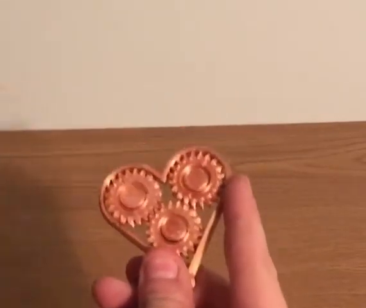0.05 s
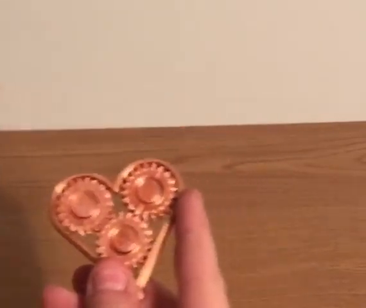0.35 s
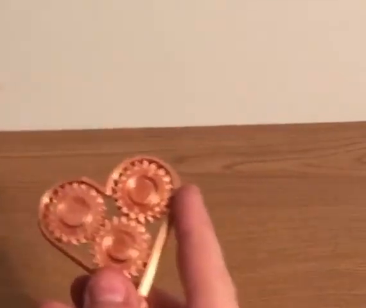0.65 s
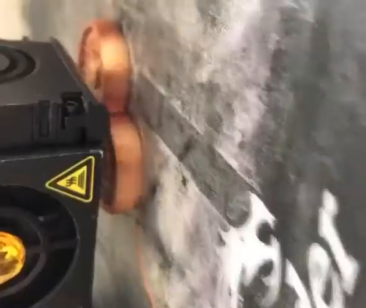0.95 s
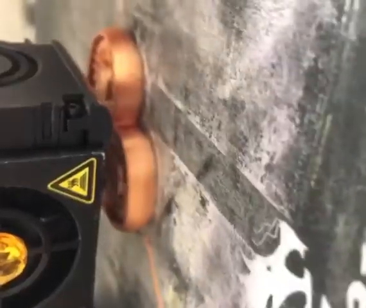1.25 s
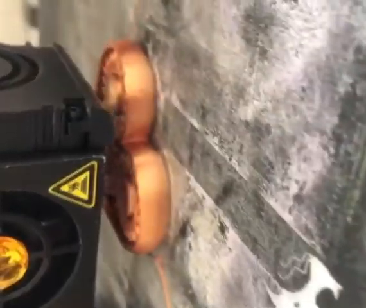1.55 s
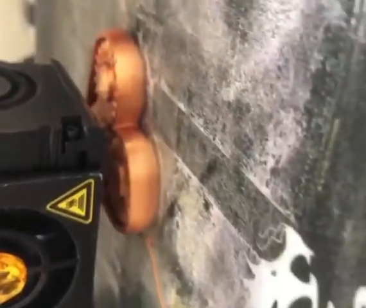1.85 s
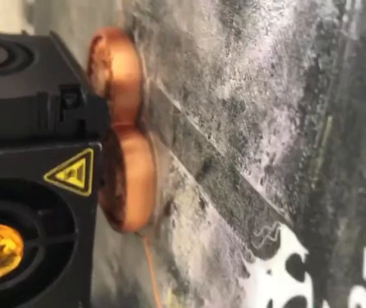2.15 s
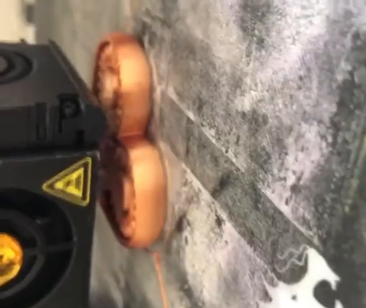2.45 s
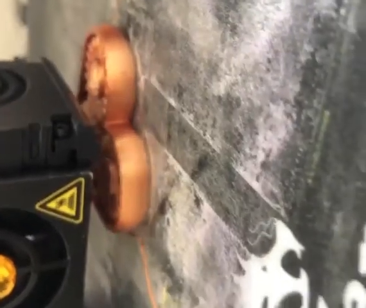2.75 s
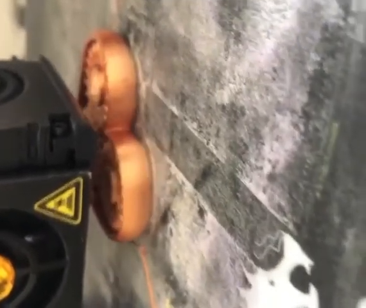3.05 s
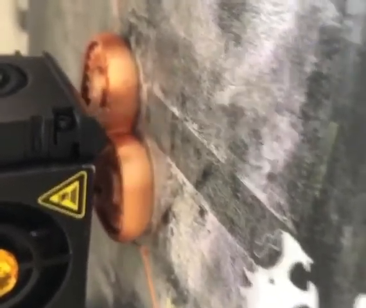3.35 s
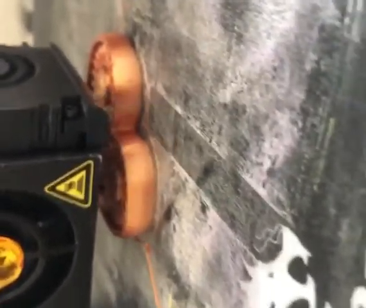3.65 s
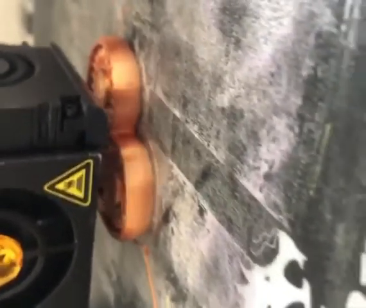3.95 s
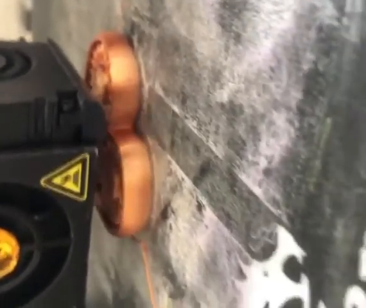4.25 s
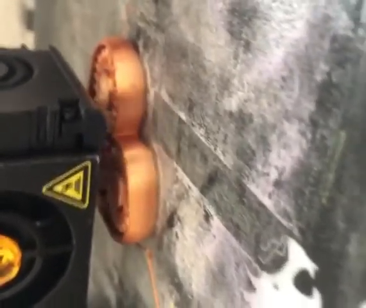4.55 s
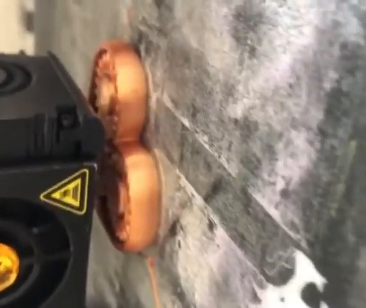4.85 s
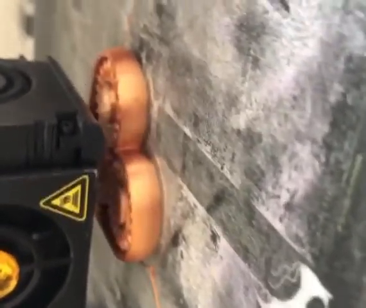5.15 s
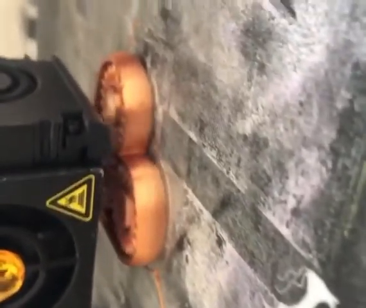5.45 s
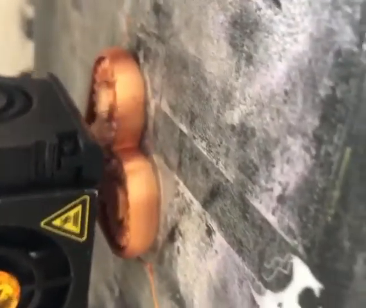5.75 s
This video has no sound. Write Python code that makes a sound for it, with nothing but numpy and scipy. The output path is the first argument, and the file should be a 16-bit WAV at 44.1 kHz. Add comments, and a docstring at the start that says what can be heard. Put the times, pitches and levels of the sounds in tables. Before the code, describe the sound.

In a quiet room, a hand faintly rustles on a small plastic gear toy, which ticks once. Suddenly a 3D printer is running close to the microphone. Its fans whir with a steady, thin whine while the motors make a quick move, then sing in smooth rising and falling sweeps. They switch to a fast back-and-forth zigzag, with light rattles and short shudders at the turns.

```python
"""A 3D printer starts up

In a quiet room a hand turns a small gear toy, which rustles and ticks once. Suddenly a 3D printer is
at work close by, in mono. Its fans whir and whine while two stepper motors trace two circles, then a
fast zigzag filling, with quick hops in between. The motors move in tiny steps: they sing at the rate
of those steps, hum at the slower rate of their full steps and shake the frame at the turns."""
import sys
import numpy as np
from scipy import signal
from scipy.fft import rfft, irfft, next_fast_len
from scipy.io import wavfile

SR = 44100
rng = np.random.default_rng(int(sys.argv[2]) if len(sys.argv) > 2 else 0)


def materialize(psi):
    """Save the field psi as 16-bit PCM at rate SR to the path in sys.argv[1].

    A 1-D psi becomes a single channel; in a 2-D psi each row is a channel.
    """
    bounded = np.clip(np.atleast_2d(psi).T, -1, 1)
    quanta = np.round(bounded * 32767).astype(np.int16)
    wavfile.write(sys.argv[1], SR, quanta)


N = 265041
T = np.arange(N) / SR

# the room's hush and the hand's rustle (frequency [Hz], level [dB])
ROOM = [(20, -112), (45, -89), (100, -88.5), (250, -94), (450, -96.5), (800, -104), (2000, -112),
        (5000, -114), (15000, -116)]
RUSTLE = [(30, -105), (120, -90), (400, -99), (1000, -110), (4000, -114), (15000, -113)]
# a low hum and a faint, thin high whistle in the room (frequency [Hz], width [Hz], boost [dB])
HUM_AND_WHISTLE = [(77, 16, 13), (5300, 350, 8)]
# the tick of the gears (frequency [Hz], level [dB])
TICK = [(100, -98), (600, -84), (1300, -85), (2600, -106), (15000, -125)]
# rushing fan air (frequency [Hz], level [dB])
AIR = [(25, -100), (55, -78.5), (150, -80.5), (330, -71), (480, -79.5), (900, -78.5), (1450, -81),
       (2000, -78), (3300, -78.5), (4500, -83), (5700, -83.5), (7300, -92), (9500, -96.5), (13300, -95.5),
       (15500, -102)]
# resonances (ringing pitches) of the air duct and frame (frequency [Hz], width [Hz], boost [dB])
AIR_MODES = [(60, 14, 8), (76, 14, 8), (125, 20, 13), (150, 16, -6), (180, 28, 12), (207, 14, -5),
             (243, 20, 9), (328, 45, 7), (380, 40, 7), (565, 30, 3), (850, 90, 4), (1330, 130, 2),
             (2810, 180, 4), (3840, 120, -6), (5680, 160, 3), (6320, 160, -4), (7850, 300, 6),
             (8300, 90, 10), (8750, 160, 5), (10200, 110, 6), (10900, 350, 3), (13030, 160, 3),
             (15000, 300, 4)]
# tones of the small fan's blades (multiple of BLADE_HZ, level [dB])
BLADES = [(1, -55), (2, -56), (3, -55), (4, -75)]
# steady tones of the fan motors (frequency [Hz], level [dB])
FAN_TONES = [(2579, -61), (2826, -56), (3035, -56), (3331, -65), (3574, -66), (3908, -67), (4883, -67),
             (5652, -68), (5860, -72)]
# quick hops of the print head (start [s], end [s], step rate limit [Hz], whine [dB], hum [dB])
HOPS = [(.8, 1.066, 6350, -1.5, 1), (1.05, 1.21, 7400, -8, -12), (5.587, 5.756, 5660, 1, -1)]
# motor whine: both on a straight move, then each on a circle (multiple of the step rate, level [dB])
STRAIGHT_WHINE = [(1, -46), (2, -53.5), (3, -62.5)]
X_WHINE = [(1, -62), (2, -51), (3, -54)]
Y_WHINE = [(1, -45), (2, -58), (3, -69)]
# motor hum on straight moves and on circles (multiple of the full-step rate, level [dB])
STRAIGHT_HUM = [(1, -51.5), (2, -65.5), (3, -67.5), (4, -74.5), (6, -79), (8, -60)]
CIRCLE_HUM = [(1, -59), (2, -56.5), (4, -62.5), (5, -57), (6, -58.5)]
# on a circle the X and Y motors take turns; the X motor's sweeps (time of top speed [s])
X_SWEEPS = [1.565, 1.96, 2.43, 2.85]
# the Y motor's sweeps (time of top speed [s], shudder speeding up [dB], shudder slowing down [dB])
Y_SWEEPS = [(1.36, -32, -35), (1.77, -35, -43), (2.2, -32.5, -36), (2.64, -33.5, -26)]
# zigzags that fill a disc (start [s], first line from centre [steps], line spacing [steps], strokes)
ZIGZAGS = [(2.904, -151.2, 25.25, 16), (5.724, -176.4, -25.25, 2)]
# how well the motor mounts give off sound (frequency [Hz], gain [dB])
MOUNT = [(40, -25), (120, -4), (300, 0), (1000, -3), (1700, -9), (2500, -14), (3200, -4), (3800, -7),
         (4900, -10), (6500, -11), (7300, -17), (9000, -11), (15000, -11)]
# resonances of the mounts (frequency [Hz], width [Hz], boost [dB])
MOUNT_MODES = [(283, 50, 8), (338, 50, 8), (660, 50, 3), (860, 100, 4), (1005, 50, 8), (2795, 110, 13),
               (3480, 350, 7), (4080, 180, 5), (4530, 160, 6), (5620, 200, 14), (6350, 200, -8),
               (7880, 220, 12), (8340, 160, 14), (9050, 200, 8), (11320, 200, 4), (13570, 300, 6)]
# rattle of the belts and the carriage that holds the head (frequency [Hz], level [dB])
RATTLE = [(40, -81.5), (120, -75.5), (330, -77), (480, -81), (900, -79), (1400, -87), (3000, -89.5),
          (7000, -113.5), (15000, -110)]
# resonances of that rattle (frequency [Hz], width [Hz], boost [dB])
RATTLE_MODES = [(331.8, 72, 19.4), (862, 58, 10.6), (1001, 44, 11.4)]
# single jolts of the frame (time [s], level [dB])
JOLTS = [(.833, -35.5), (.883, -30.5), (1.016, -30), (1.665, -31.5), (2.108, -28), (5.518, -36),
         (5.622, -33), (5.69, -34.5)]
# the frame's shudder after each zigzag turn (level [dB])
TURN_DB = [-44, -34.5, -43, -34, -44, -32, -34.5, -39, -45, -38, -31, -39, -35, -37, -34, -42]
# squeaks in every Y sweep (time from top speed [s], pitch [Hz], level [dB], glide [Hz/s])
SQUEAKS = [(-.098, 4120, -47, -26000), (0.043, 5380, -50, -12000)]

BLADE_HZ, FRAME_HZ, TOP_HZ = 893.7, 337.7, 15600  # fan blade tone, frame resonance, treble limit
MICROSTEPS = 16  # tiny steps in one full step
ZIGZAG_HZ, CIRCLE_HZ = 4524, 2795  # top step rates
ZIGZAG_RAMP_HZ_PER_S, HOP_RAMP_HZ_PER_S, CIRCLE_RAD_PER_S = 56600, 80000, 7.3
DISC_RADIUS_STEPS, TURN_OVERLAP_S = 268.3, .02624
ROOM_END_S, PRINTER_START_S, PRINTER_FULL_S = .775, .788, .812
PRINTER_DB, RISE_DB_PER_S = -.5, .19


def undb(db):
    """Turn decibels into a number to multiply by."""
    return 10 ** (np.asarray(db) / 20)


def noise():
    """An even hiss (white noise) of 0 dB per Hz."""
    return rng.standard_normal(N) * np.sqrt(SR / 2)


def wander(rate):
    """A smooth random wobble of about size 1, changing about rate times a second."""
    f = np.arange(N // 2 + 1) * SR / N
    wobble = irfft(rfft(rng.standard_normal(N)) * np.exp(-(f / rate) ** 2), N)
    return wobble / wobble.std()


def swell(time, length):
    """A bell-shaped rise and fall around time, length seconds wide at half height."""
    return np.exp(-np.log(2) * (2 * (T - time) / length) ** 2)


def fade_in(start, length=.0088):
    """A quick ramp from silence to full."""
    return np.clip((T - start) / length, 0, 1)


def colour(sound, outline, peaks):
    """Shape a sound's bass and treble with a smooth outline, plus narrow peaks and dips."""
    size = 2 * next_fast_len(N // 2 + 8192)
    f = np.arange(size // 2 + 1) * SR / size
    hz, db = np.transpose(outline)
    gain_db = np.interp(np.log(f + 1), np.log(hz), db)
    for centre, width, boost in peaks:
        gain_db = gain_db + boost / (1 + (2 * (f - centre) / width) ** 2)
    # this makes the filter ring after each sound, never before it
    cepstrum = irfft(np.log(undb(gain_db)))[:size // 2]
    cepstrum[1:] *= 2
    return irfft(rfft(sound, size) * np.exp(rfft(cepstrum, size)))[:N]


def tones(hz, multiples, flutter_db):
    """Tones at multiples of a moving pitch, each fluttering in level."""
    phase = 2 * np.pi * np.cumsum(hz) / SR
    out = 0
    for k, db in multiples:
        gain = undb(db + flutter_db * wander(24.5)) * (k * hz < TOP_HZ)
        out = out + np.sqrt(2) * gain * np.sin(k * phase + rng.uniform(0, 2 * np.pi))
    return out


def rings(rows):
    """Tones that swell and die away (time [s], pitch [Hz], level [dB], length [s], glide [Hz/s])."""
    out = np.zeros(N)
    for time, hz, db, length, glide in rows:
        cycles = (hz + glide * (T - time) / 2) * (T - time)
        tone = np.sin(2 * np.pi * cycles + rng.uniform(0, 2 * np.pi))
        out += np.sqrt(2) * undb(db) * swell(time, length) * tone
    return out


def room():
    """The hush of a quiet room, with a low hum and a faint, thin high whistle."""
    return undb(-2.3) * colour(noise(), ROOM, HUM_AND_WHISTLE)


def gear_toy(tick_s=.723, decay_s=.0014):
    """A hand rustles on a small plastic toy, then its gears tick once."""
    rustle = colour(noise() * swell(time=.23, length=.17), RUSTLE, [])
    burst = noise() * (T >= tick_s) * np.exp(-np.abs(T - tick_s) / decay_s)
    return rustle + colour(burst, TICK, [])


def fans():
    """Air rushes through the ducts under slightly wavering blade and motor tones."""
    air = colour(noise() * undb(.81 * wander(40)), AIR, AIR_MODES)
    blade_hz = BLADE_HZ * (1 + .00095 * wander(3.47) + .0015 * wander(38.6))
    blades = tones(blade_hz, BLADES, flutter_db=2.5)
    speed = 1 + .0005 * wander(4)
    whine = sum(tones(hz * speed, [(1, db)], flutter_db=1.8) for hz, db in FAN_TONES)
    return air + blades + whine


def straight(start, end, top_hz, ramp):
    """Step rate of a straight move: it speeds up evenly, at most to top_hz, then slows to a stop."""
    return np.clip(ramp * np.minimum(T - start, end - T), 0, top_hz)


def circling(peak_times):
    """Step rate of one motor on a circle: a rounded rise and fall for each sweep across."""
    angles = [CIRCLE_RAD_PER_S * (T - time) for time in peak_times]
    return sum(CIRCLE_HZ * np.cos(np.clip(angle, -np.pi / 2, np.pi / 2)) for angle in angles)


def strokes():
    """Zigzag lines across the disc (start [s], end [s]); longer ones overlap the next one more."""
    ramp_s = ZIGZAG_HZ / ZIGZAG_RAMP_HZ_PER_S  # time lost speeding up and slowing down
    out = []
    for start, first, spacing, count in ZIGZAGS:
        for line in range(count):
            width_share = np.sqrt(1 - ((first + line * spacing) / DISC_RADIUS_STEPS) ** 2)
            end = start + 2 * DISC_RADIUS_STEPS * width_share / ZIGZAG_HZ + ramp_s
            out.append((start, end))
            start = end - TURN_OVERLAP_S * width_share ** 2
    return out


def stepper(rate, whine_tones, hum_tones, whine_db=0, hum_db=0):
    """A motor's tiny steps whine and its full steps hum; both fade as it comes to rest."""
    step_hz = rate * (1 + .004 * wander(200))
    full_step_hz = rate / MICROSTEPS * (1 + .012 * wander(60))
    # the motor's pull ripples once per full step, which roughens the whine
    ripple = 1 + .6 * np.sin(2 * np.pi * np.cumsum(full_step_hz) / SR)
    whine = tones(step_hz, whine_tones, flutter_db=1.8) * ripple
    hum = tones(full_step_hz, hum_tones, flutter_db=3)
    drive = np.minimum(rate / 2400, 1)
    return (undb(whine_db) * whine + undb(hum_db) * hum) * drive


def rattle(rate):
    """Belts and carriage rattle most at low speed, where the head turns round."""
    turning = np.exp(-(rate / 2300) ** 2)
    shaking = noise() * (.25 + turning) * undb(2.8 * wander(55))
    return colour(shaking, RATTLE, RATTLE_MODES)


def shudders(jolt_s=.02, sweep_s=.025, turn_s=.023, turn_lag_s=.01384):
    """The frame rings briefly at single jolts, twice in each Y sweep and after each zigzag turn."""
    rows = [(time, db, jolt_s) for time, db in JOLTS]
    # on a circle the frame shakes when four times the full-step rate passes its resonance
    shaking_rate = FRAME_HZ * MICROSTEPS / 4
    offset = np.arccos(shaking_rate / CIRCLE_HZ) / CIRCLE_RAD_PER_S
    for time, speeding_db, slowing_db in Y_SWEEPS:
        rows += [(time - offset, speeding_db, sweep_s), (time + offset, slowing_db, sweep_s)]
    moves = strokes()
    turns = [(end + start) / 2 for (_, end), (start, _) in zip(moves, moves[1:]) if start < end]
    rows += [(time + turn_lag_s, db, turn_s) for time, db in zip(turns, TURN_DB)]
    return rings([(time, FRAME_HZ, db, length, 0) for time, db, length in rows])


def squeaks(length_s=.018):
    """The carriage gives two falling squeaks in every Y sweep, as motor tones cross its resonances."""
    return rings([(time + offset, hz, db, length_s, glide)
                  for time, _, _ in Y_SWEEPS for offset, hz, db, glide in SQUEAKS])


def hop_beep(time=5.671, hz=5660, db=-43, length_s=.026):
    """The last hop runs right on a resonance and beeps."""
    return rings([(time, hz, db, length_s, 0)])


def printer():
    """Fans, motors on their mounts and the shaking frame, through circles, zigzags and hops."""
    x_rate = circling(X_SWEEPS)
    y_rate = circling([time for time, _, _ in Y_SWEEPS])
    stroke_rates = [straight(start, end, ZIGZAG_HZ, ZIGZAG_RAMP_HZ_PER_S) for start, end in strokes()]
    zigzag_rate = np.max(stroke_rates, axis=0)
    motors = undb(-.3) * stepper(x_rate, X_WHINE, CIRCLE_HUM)
    motors += undb(-.1) * stepper(y_rate, Y_WHINE, CIRCLE_HUM)
    motors += undb(1) * stepper(zigzag_rate, STRAIGHT_WHINE, STRAIGHT_HUM)
    fastest = np.max([x_rate, y_rate, zigzag_rate], axis=0)
    for start, end, top_hz, whine_db, hum_db in HOPS:
        rate = straight(start, end, top_hz, HOP_RAMP_HZ_PER_S)
        motors += stepper(rate, STRAIGHT_WHINE, STRAIGHT_HUM, whine_db, hum_db)
        fastest = np.maximum(fastest, rate)
    mounted_motors = colour(motors, MOUNT, MOUNT_MODES)
    return fans() + mounted_motors + rattle(fastest) + shudders() + squeaks() + hop_beep()


def scene():
    """Room and toy give way to the printer, which cuts in softly, then fully, and grows a bit louder."""
    entry = np.maximum(undb(-8.5) * fade_in(PRINTER_START_S), fade_in(PRINTER_FULL_S))
    level = undb(PRINTER_DB + RISE_DB_PER_S * (T - PRINTER_START_S))
    printing = entry * level * printer()
    opening = (1 - fade_in(ROOM_END_S)) * (room() + gear_toy())
    return np.tile(opening + printing, (2, 1))  # both channels alike


def record(dry):
    """The microphone drops the deepest bass, and the highest treble is cut off."""
    thin = signal.sosfilt(signal.butter(4, 33, "high", fs=SR, output="sos"), dry)
    return signal.sosfilt(signal.ellip(10, .2, 70, TOP_HZ, fs=SR, output="sos"), thin)


dry = scene()
out = record(dry)
materialize(out)
```